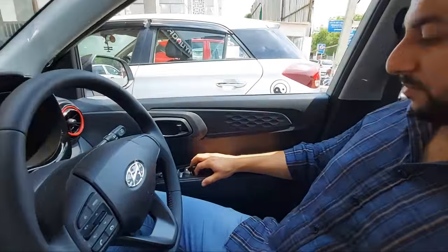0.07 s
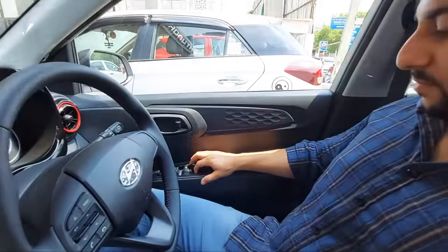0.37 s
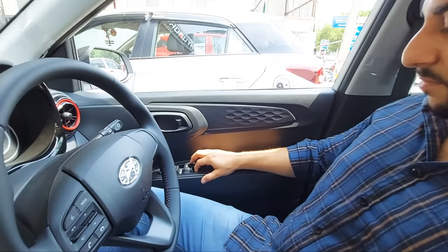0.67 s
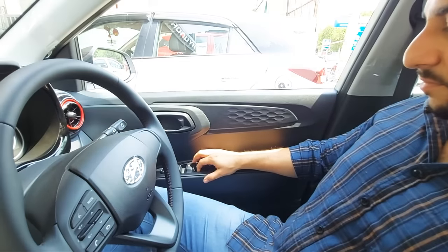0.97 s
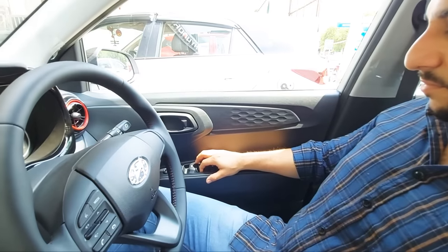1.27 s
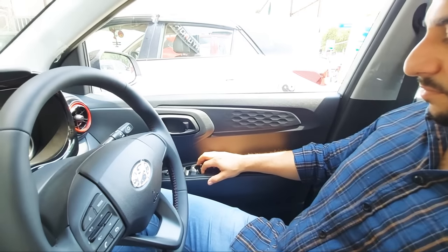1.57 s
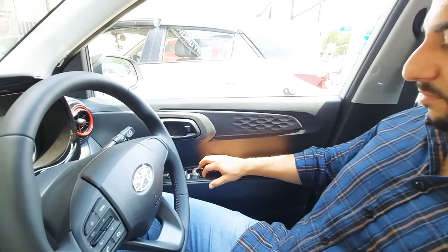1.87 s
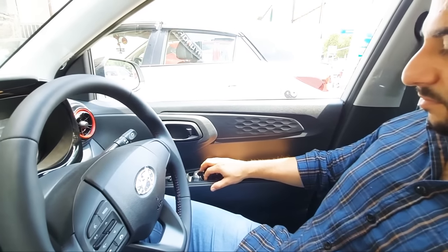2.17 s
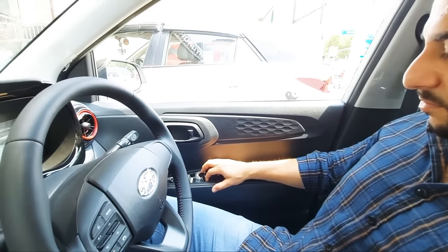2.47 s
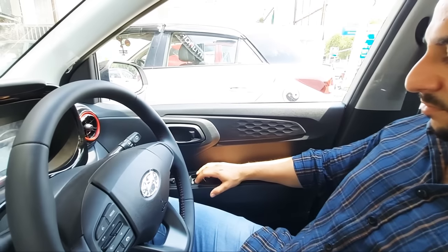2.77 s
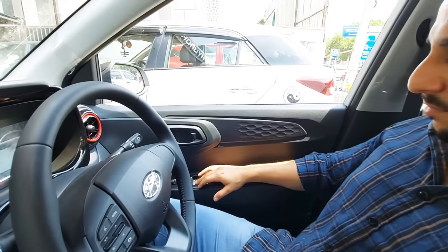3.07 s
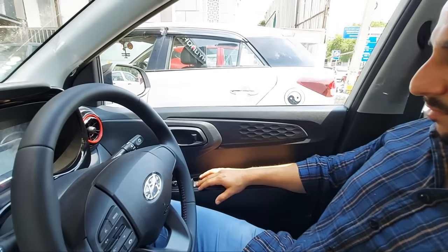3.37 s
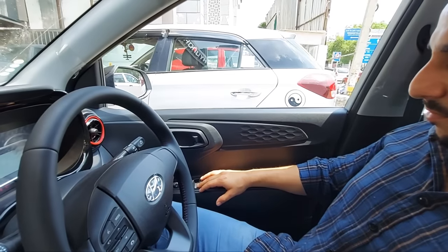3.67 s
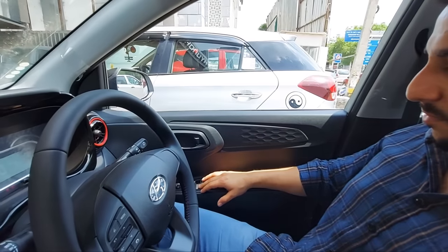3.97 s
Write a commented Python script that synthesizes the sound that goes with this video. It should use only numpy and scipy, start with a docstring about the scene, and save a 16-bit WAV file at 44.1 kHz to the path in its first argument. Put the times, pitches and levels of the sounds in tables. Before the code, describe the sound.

A car's power window rises close on the right after faint switch ticks, swishing with a soft motor whine and small squeaks. At about 2.4 seconds it thumps shut into its rubber seal. The switch clicks sharply at 2.6 seconds and more lightly at 2.8; the glass shudders free and lowers with a higher whine until 4 seconds. The idling engine and outside traffic rumble throughout in the cabin.

```python
"""A switch ticks and a power window slides up, rubs into its rubber seal and thumps home in the door.
The switch clicks, clicks again more lightly, and the glass shudders free and runs down on a whining motor.
The glass swishes in its channels, each knock rings the door's modes, and faint whistles swell and fade.
Heard in stereo from the passenger seat of a parked car, the door close on the right.
The idling engine booms in the cabin and traffic rumbles outside."""
import sys
import numpy as np
from scipy import signal
from scipy.fft import rfft, irfft
from scipy.io import wavfile
from scipy.ndimage import uniform_filter1d, minimum_filter1d

SR = 44100
rng = np.random.default_rng(int(sys.argv[2]) if len(sys.argv) > 2 else 0)


def wrap_up_sound(samples):
    """Save the sound to the file named by the first command line argument, as 16-bit audio."""
    columns = np.atleast_2d(samples).T
    # keep every value between -1 and 1, then stretch to whole-number steps
    tamed = np.clip(columns, -1, 1)
    steps = np.round(tamed * 32767).astype(np.int16)
    wavfile.write(sys.argv[1], SR, steps)


N = 176400
t = np.arange(N) / SR

# The moving glass, close on the right: colours (frequency [Hz], density [dB])
DRONE_COLOUR = [(90,3),(150,11.5),(200,-0.5),(270,11),(360,-4),(450,-5.5),(650,-9.5),(900,-16.5),(1200,-38),(1600,-19),(2400,-38),(3500,-52),(8000,-61)]
SWISH_COLOUR = [(900,2.5),(1300,-0.5),(1700,1),(2400,-4.5),(2950,-5.5),(3600,-2.5),(4500,0.5),(5800,-1),(7000,2),(8100,4.5),(9200,-5),(11000,-5.5),(12500,-3.5),(15500,-10)]
SCRAPE_COLOUR = [(1800,-36),(2350,-3),(2600,-1.5),(2850,0.5),(3200,-1),(3700,0),(4300,-5.5),(5500,-21)]
RUSH_COLOUR = [(250,-4),(450,6),(900,0),(1300,-5),(2400,-7.5),(3300,-21),(8000,-35)]
# and the course of each (time [s], level [dB])
DRONE_LEVEL = [(0,-44),(.6,-44),(1.2,-36.5),(1.6,-42.5),(2.3,-42.5),(2.37,-19.5),(2.42,-44),(2.78,-63),(2.83,-34),(3.2,-32.5),(3.5,-33.5),(3.85,-31),(4,-33)]
SWISH_LEVEL = [(0,-48),(.24,-44),(.5,-48),(1.15,-46),(1.5,-50),(2.0,-50),(2.28,-54.5),(2.36,-49),(2.42,-82),(2.79,-87),(2.86,-47.5),(3.15,-46.5),(3.5,-46.5),(3.8,-44.5),(4,-45)]
SCRAPE_LEVEL = [(0,-55),(.24,-49),(.5,-54.5),(1.1,-56),(1.45,-61),(2.3,-79),(2.8,-83),(2.9,-54.5),(3.3,-53),(3.8,-52.5),(4,-49)]
RUSH_LEVEL = [(0,-44),(.5,-43),(1.0,-48),(1.4,-57),(2.3,-50.5),(2.52,-62),(3.6,-57),(4,-43.5)]
def sliding_glass():
    """The door drones and the felt channels swish and scrape as the glass moves; a soft rush swells."""
    drone = noise(DRONE_COLOUR) * amp(curve(DRONE_LEVEL) + 2.1 * wander(29.8))
    swish = noise(SWISH_COLOUR) * amp(curve(SWISH_LEVEL) + 0.5 * wander(60))
    scrape = noise(SCRAPE_COLOUR) * amp(curve(SCRAPE_LEVEL))
    rush = noise(RUSH_COLOUR) * amp(curve(RUSH_LEVEL))
    return drone + swish + scrape + rush


# Knocks in the door (time [s], level [dB], contact [s], low-mode gain [dB], high-mode gain [dB])
THUMPS = [(2.352,-9.5,0.0031,-11,-24),(2.3602,-2.5,0.00815,-1.5,-14),(2.385,-12.5,0.0064,0,-16),(2.422,-20,0.0081,-2,-14),(2.449,-10.5,0.016,2,-14),(2.8025,-23.5,0.0018,0,1.5),(2.8135,-16,0.003,1,3)]
# The door's modes (frequency [Hz], level [dB], t60 [s])
DOOR_MODES = [(74,-1,0.076),(113.8,-0.5,0.148),(166,-14.5,0.096),(266.5,-8.5,0.14),(313,-9,0.091),(360,-13,0.072),(435,-20.5,0.11),(534,-13.5,0.18),(672.3,-9.5,0.12),(870,-17,.14)]
def door_thumps(low_hz=200, high_hz=490):
    """The glass hits its stop, the door settles, the glass pulls free: each pushes the door's modes."""
    out = 0
    for at, db, contact, low_db, high_db in THUMPS:
        body = sum(amp(mode_db + low_db * (hz < low_hz) + high_db * (hz > high_hz)) * ring(hz, t60)
                   for hz, mode_db, t60 in DOOR_MODES)
        push = -np.sin(np.linspace(0, 2 * np.pi, max(int(contact * SR), 4)))  # push and recoil
        push /= np.maximum(push, 0).sum()
        out += place(np.convolve(body, push), at, db)
    return out


# Rubs at the top of the frame (start [s], peak [s], release [s], end [s], start [dB], peak [dB])
RUBS = [(2.288,2.355,2.355,2.398,-41.5,-33),(2.841,2.873,2.905,2.953,-36.5,-28)]
# Colours of the rub and the shudder (frequency [Hz], density [dB])
RUB_COLOUR = [(200,-14),(600,-28),(1000,1.5),(1400,0),(2000,-2),(2700,2),(3500,3),(4500,4.5),(6000,0.5),(8100,4),(9300,-7),(12500,-5.5),(15500,-11.5)]
SHUDDER_COLOUR = [(40,0.5),(90,9.5),(140,-3),(200,-4.5),(330,1),(430,-10),(540,-13.5),(700,-15),(900,-14),(1400,-32),(2500,-38),(6000,-40.5),(16000,-53)]
# The glass unsticking (time [s], level [dB])
SHUDDER_LEVEL = [(2.775,-39.5),(2.8,-23),(2.815,-18.5),(2.835,-21.5),(2.87,-24.5),(2.92,-44),(2.96,-65)]
def seal(attack_s=0.0079, fall_db=33, grain_db=1):
    """Grainy rubbing as the glass enters and leaves the rubber seal, and a shudder as it unsticks."""
    envelope = 0
    for start, peak, release, end, start_db, peak_db in RUBS:
        db = np.interp(t, [start, peak], [start_db, peak_db])
        db -= fall_db * np.maximum(t - release, 0) / (end - release)
        envelope += amp(db) * np.exp(np.minimum(t - start, 0) / attack_s)
    rub = noise(RUB_COLOUR) * envelope * amp(grain_db * wander(770))
    return rub + noise(SHUDDER_COLOUR) * amp(curve(SHUDDER_LEVEL))


# Whine from inside the door (time [s], pitch [Hz], level [dB], second harmonic [dB])
MOTOR_UP = [(0,691,-62,-58),(.85,718,-55,-63.5),(.97,710,-57,-54),(1.2,701,-58,-53.5),(1.4,698.2,-61.5,-60.5),(2.3,683,-55.5,-61)]
MOTOR_DOWN = [(2.84,801,-68,-60),(2.95,828,-49,-58),(3.08,825.5,-55.5,-56),(3.27,817,-50,-70),(3.48,806.4,-51,-51.5),(3.8,820.4,-49,-47),(3.92,817,-53,-56),(4,824,-50,-62)]
def motor(jitter=0.00448):
    """The motor whines and buzzes, lower in pitch when lifting the glass than when lowering it."""
    out = 0
    for run, buzz_db in ((MOTOR_UP, -65), (MOTOR_DOWN, -60.5)):
        hz = curve(run) * (1 + jitter * wander(70))
        start, stop = run[0][0], run[-1][0]
        running = np.clip((t - start) / 0.016, 0, 1) * np.clip((stop - t) / 0.06 + 1, 0, 1)
        buzz = amp(buzz_db) * armature_buzz(hz)
        whine = sum(amp(curve(run, column=k + 1)) * commutator_whine(hz * k) for k in (1, 2))
        out += running * (buzz + whine)
    return out


def commutator_whine(hz, flutter_db=3.5):
    """One harmonic of the commutator, fluttering differently at each microphone."""
    phase = 2 * np.pi * np.cumsum(hz) / SR
    return np.array([np.sqrt(2) * np.sin(phase + lag) * amp(flutter_db * wander(24.85))
                     for lag in (0, 1)])


def armature_buzz(whine_hz, segments=8, db_per_octave=-4, scatter_db=5):
    """Uneven harmonics of the armature's turn, which takes one whine cycle per commutator segment."""
    turn = 2 * np.pi * np.cumsum(whine_hz / segments) / SR
    orders = np.arange(3, 52)
    slope_db = db_per_octave * np.log2(orders / segments)
    sizes = amp(slope_db + scatter_db * rng.standard_normal((2, len(orders))))
    phasors = sizes * np.exp(2j * np.pi * rng.random(sizes.shape))
    angle = np.linspace(0, 2 * np.pi, 2048)
    one_turn = (phasors @ np.exp(1j * np.outer(orders, angle))).imag
    return np.array([np.interp(turn % (2 * np.pi), angle, side) for side in one_turn])


# The door switch, within arm's reach (time [s], snap [dB], panel [dB], brightness [dB/octave])
CLICKS = [(0.031,-28,-60,1),(0.141,-23,-60,19),(1.998,-37,-17,0),(2.5726,-5.5,-1.5,2),(2.7832,-11,-20,32)]
# The rocker's modes (frequency [Hz], level [dB], t60 [s], left minus right [dB])
SNAP_MODES = [(5800,-31,0.023,-5),(6366,-24.5,0.026,-20),(7640,-13.5,0.012,-16),(8270,-17,0.016,-16),(10530,-20.5,0.015,9),(12170,-18.5,0.01,-9)]
# The panel's modes (frequency [Hz], level [dB], t60 [s])
PANEL_MODES = [(301.3,-36,.05),(500,-34,0.038),(825,-28,0.1),(912,-35,0.077),(1092,-41,0.026),(1396,-31,0.048),(2044,-37.5,0.082),(2530,-34,0.064),(2960,-45,.04),(3775,-29.5,0.042)]
# Colours of the rocker's crack and the loose plastic behind the panel (frequency [Hz], density [dB])
CRACK_COLOUR = [(500,-16),(1200,-7),(3000,-21),(5000,-2),(7800,22),(9500,18),(12500,8),(16000,-28)]
CHATTER_COLOUR = [(250,-6),(550,2),(850,9),(1100,-1),(1400,2.5),(2100,-3),(2500,-5),(3800,-9),(5000,-9),(8000,-7),(15000,-15)]
def switch_clicks(bounce_s=0.0028, panel_lag_s=0.003, chatter_s=0.0072, pivot_hz=11100):
    """A plastic rocker snaps and bounces; the panel around it rings and chatters just after."""
    rings, crack, chatter = 0, 0, 0
    for at, snap_db, panel_db, brightness in CLICKS:
        tilt = lambda hz: brightness * np.log2(hz / pivot_hz)
        snap = sum(amp(db + tilt(hz) + np.array([[pan], [-pan]]) / 2) * ring(hz, t60)
                   for hz, db, t60, pan in SNAP_MODES)
        panel = sum((-1) ** k * amp(db) * ring(hz, t60) for k, (hz, db, t60) in enumerate(PANEL_MODES))
        rings += place(snap, at, snap_db) + place(snap, at + bounce_s, snap_db + 1)
        rings += place(panel, at + panel_lag_s, panel_db)
        colour = [(hz, db + tilt(hz)) for hz, db in CRACK_COLOUR]
        crack += amp(snap_db - 22.5) * decay(at, t60=0.062) * noise(colour)
        age = np.maximum(t - at - bounce_s / 2, 0) / chatter_s
        chatter += amp(panel_db - 31) * age * np.exp(1 - age)
    return cabin(rings) + crack + chatter * noise(CHATTER_COLOUR)


# Squeaks of the rising glass (time [s], level [dB])
SQUEAKS = [(.698,-43),(0.749,-41),(0.814,-39.5),(2.348,-33.5)]
# and their colour (frequency [Hz], density [dB])
SQUEAK_COLOUR = [(2600,-24),(3200,-5),(3800,-1),(4600,-18),(6600,-16),(7400,6),(8300,8),(9200,-11),(14000,-22)]
def squeaks(width_s=0.013):
    """Small chirps of glass against rubber, the last as it wedges into the seal."""
    return noise(SQUEAK_COLOUR) * sum(amp(db) * np.exp(-((t - at) / width_s) ** 2) for at, db in SQUEAKS)


# Faint tones heard from the seat (start [s], peak [s], end [s], pitch [Hz], width [Hz], level [dB])
WHISTLES = [(0.075,.175,0.28,3555,43,-48.5),(.19,.295,.39,3535,24,-49.5),(2.9,3.95,5.0,3376,12,-53),(2.95,4.0,4.6,3445,65,-53),(3.3,3.9,4.4,3800,20,-60),(3.657,3.78,3.89,1882,40,-52),(.2,1.5,2.9,1270,100,-59.5),(1.0,1.7,2.3,2196,12,-64),(1.7,2.05,2.45,4420,24.1,-68)]
def whistles(fade_db=20, rasp_db=-1.5):
    """Thin, faint whistling tones that rasp, swell and fade while the window moves."""
    out = 0
    offsets = np.linspace(-12, 12, 49)  # in widths from the centre
    skirt_db = -25 * np.log10(1 + offsets ** 2)
    for start, peak, end, hz, width, db in WHISTLES:
        colour = np.column_stack([hz * np.exp(offsets * width / hz), skirt_db])
        from_peak = np.where(t < peak, (peak - t) / (peak - start), (t - peak) / (end - peak))
        out += noise(colour) * amp(db - fade_db * from_peak ** 2)
    return out * amp(rasp_db * wander(200))


# The engine from inside the car (time [s], firing rate [Hz], level [dB])
IDLE = [(0.0, 49.7, -20.5), (0.48, 51.7, -19), (0.84, 52.4, -18), (0.95, 52.4, -24.5), (1.12, 53.03, -19.5),
        (1.28, 52.86, -28.5), (1.38, 53.35, -20.5), (1.85, 53.4, -21), (1.98, 54.06, -22.5),
        (2.51, 54.54, -20), (2.64, 54.3, -24), (2.72, 54, -19.5), (2.9, 55.9, -25), (3.68, 55.97, -25),
        (3.92, 57.5, -19), (4.0, 61.1, -19.5)]
def engine_idle(wobble_rad=0.13, second_harmonic_db=-21.5):
    """The idling engine booms in the cabin at its firing rate."""
    phase = 2 * np.pi * np.cumsum(curve(IDLE)) / SR + wobble_rad * wander(16)
    boom = np.sin(phase) + amp(second_harmonic_db) * np.sin(2 * phase)
    return np.sqrt(2) * boom * amp(curve(IDLE, column=2))


# The street outside and a faint hiss: colours (frequency [Hz], density [dB])
TRAFFIC_COLOUR = [(20,-22),(35,-1),(60,3),(85,-0.5),(125,3.5),(165,-3),(205,-17),(280,-9),(370,-14),(480,-32.5),(800,-30),(1050,-29.5),(1400,-44),(2200,-48),(4000,-71),(16000,-71)]
HISS_COLOUR = [(1000,-5),(2500,0),(4500,1),(6300,-2),(7900,6.5),(9500,-5.5),(12500,1),(16000,-6)]
# and the course of each (time [s], level [dB])
TRAFFIC_LEVEL = [(0,-37),(.5,-30.5),(1.1,-30),(2.5,-30.5),(4,-30.5)]
HISS_LEVEL = [(0,-89),(2.36,-53.5),(2.48,-67),(2.64,-55.5),(4,-79)]
def traffic_and_hiss():
    """Traffic rumbles unevenly; the hiss swells, dips briefly and fades."""
    rumble = noise(TRAFFIC_COLOUR) * amp(curve(TRAFFIC_LEVEL) + 0.93 * wander(5.37))
    return rumble + noise(HISS_COLOUR) * amp(curve(HISS_LEVEL))


def cabin(direct, reflections_db=-5.5):
    """Direct sound and the short, dense reflections of nearby glass and trim."""
    tail = (rng.standard_normal((2, N)) * decay(0.0025, t60=0.045))[:, :N // 20]
    tail /= np.sqrt((tail ** 2).sum(1, keepdims=True))
    reflections = signal.fftconvolve(direct * np.ones((2, 1)), tail, axes=1)[:, :N]
    return direct + amp(reflections_db) * reflections


# The microphone pair at the passenger seat (frequency [Hz], left minus right [dB], likeness [0-1])
MIC_PAIR = [(60,0.5,0.89),(130,-1.7,0.91),(302,-1.5,0.78),(626,-0.5,0.26),(1240,-2.5,0),(2360,-2,0),(4400,-7,0.04),(7060,-13.5,0),(14800,-4,0.02)]
def noise(colour, ripple_db=1.5, ripple_hz=21.7):
    """Stereo noise of unit level, rippled by cabin resonances: alike in the bass, treble to the right."""
    hz = np.arange(N // 2 + 1) * SR / N + 1e-3

    def spectrum(rows, column):
        rows = np.array(rows)
        return np.interp(np.log(hz), np.log(rows[:, 0]), rows[:, column])

    pan = amp(spectrum(MIC_PAIR, 1) / 2)
    likeness = np.clip(spectrum(MIC_PAIR, 2), 0, 1)
    white = rfft(rng.standard_normal((3, N)))
    bumps = rng.standard_normal((2, N // 100))
    ripple = np.array([np.interp(hz / ripple_hz, np.arange(len(side)), side) for side in bumps])
    pair = white[0] * np.sqrt(likeness) + white[1:] * np.sqrt(1 - likeness)
    pair *= np.array([pan, 1 / pan]) / np.sqrt(pan ** 2 + pan ** -2 + 2 * likeness)
    pair *= amp(ripple_db * ripple * np.sqrt(1 - likeness))
    x = irfft(pair * amp(spectrum(colour, 1)), N)
    return x / x.mean(0).std()


def amp(db):
    """Decibels to gain."""
    return 10 ** (np.asarray(db) / 20)


def curve(rows, column=1):
    """One column of a table, joined by straight lines in time."""
    rows = np.array(rows)
    return np.interp(t, rows[:, 0], rows[:, column])


def wander(rate_hz):
    """Smooth random drift with a spread near 1."""
    hold = int(SR / rate_hz)
    steps = np.repeat(rng.standard_normal(N // hold + 1), hold)
    return 1.3 * uniform_filter1d(uniform_filter1d(steps, hold), hold)[:N]


def decay(start, t60):
    """Sudden start and exponential decay."""
    return (t >= start) * np.exp(-np.log(1000) * np.maximum(t - start, 0) / t60)


def ring(hz, t60):
    """One struck mode dying away."""
    age = t[:N // 8]
    return np.sin(2 * np.pi * hz * age) * np.exp(-np.log(1000) * age / t60)


def place(sound, start, db):
    """A short sound set off at a moment in the scene."""
    lead = np.zeros(sound.shape[:-1] + (int(start * SR),))
    trail = np.zeros(sound.shape[:-1] + (N,))
    return amp(db) * np.concatenate([lead, sound, trail], axis=-1)[..., :N]


def scene():
    """Everything heard from the passenger seat."""
    background = engine_idle() + traffic_and_hiss() + whistles()
    window = sliding_glass() + motor() + squeaks() + seal() + door_thumps()
    return window + switch_clicks() + background


def record(dry):
    """A 27 ms limiter holds the thump under full scale; a steep low-pass cuts the top."""
    ceiling, span, top_hz = 0.87, int(0.027 * SR), 15750
    gain = ceiling / np.maximum(np.abs(dry).max(0), ceiling)
    held = dry * uniform_filter1d(minimum_filter1d(gain, span), span)
    return signal.sosfilt(signal.ellip(10, 0.1, 80, top_hz, fs=SR, output="sos"), held)


dry = scene()
out = record(dry)
wrap_up_sound(out)
```